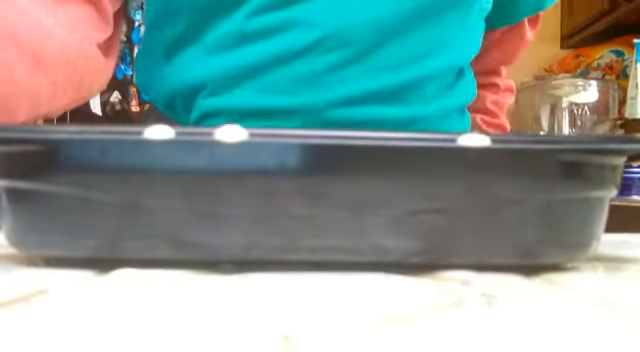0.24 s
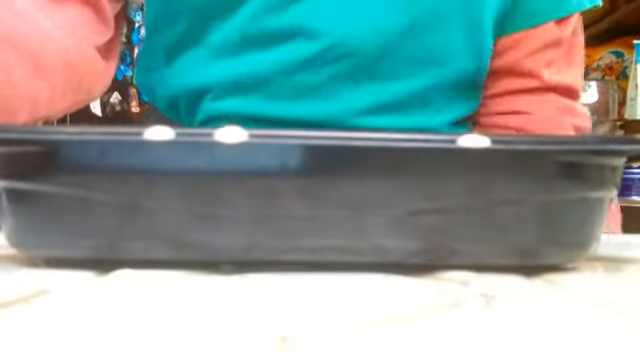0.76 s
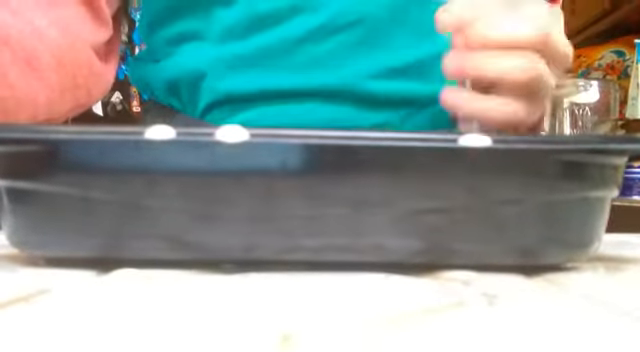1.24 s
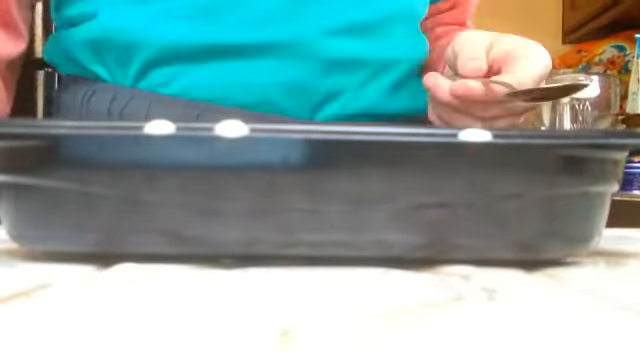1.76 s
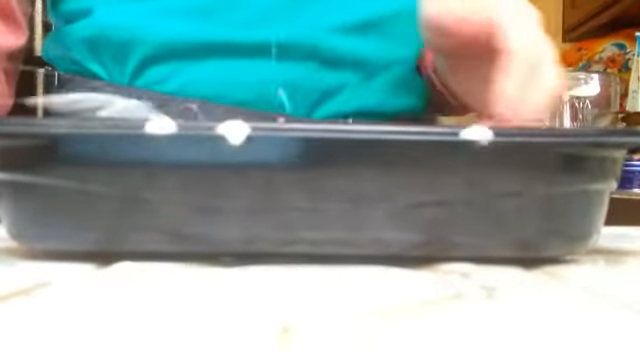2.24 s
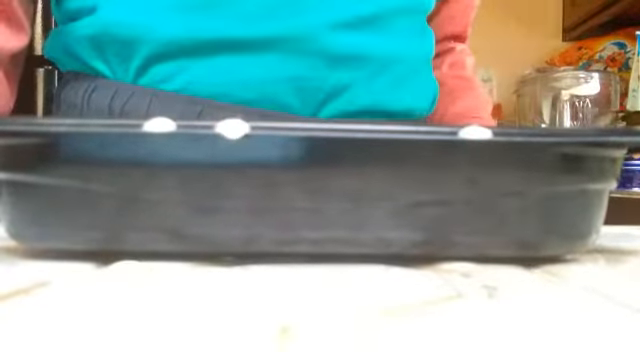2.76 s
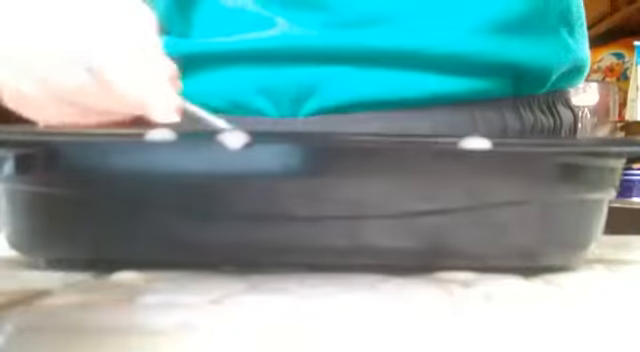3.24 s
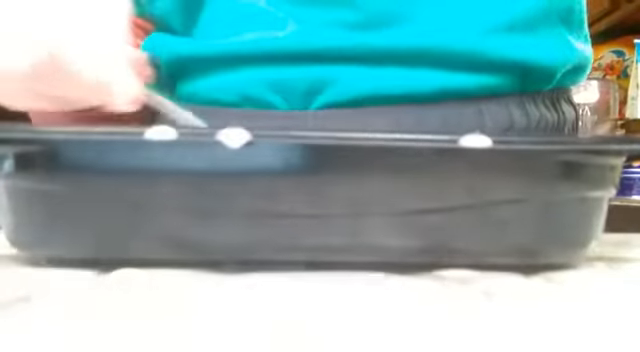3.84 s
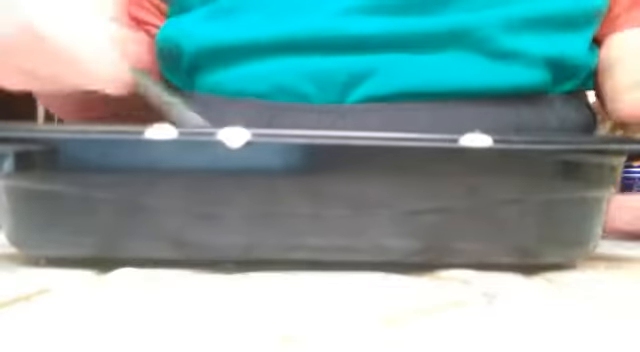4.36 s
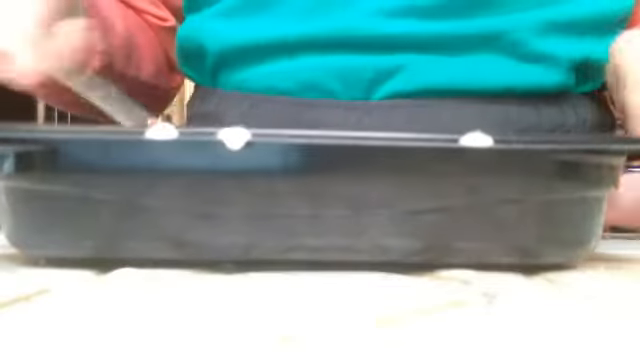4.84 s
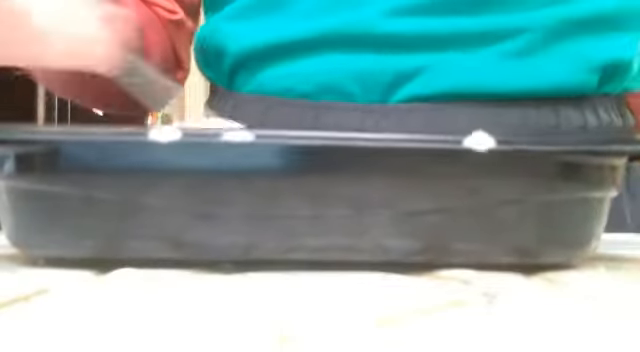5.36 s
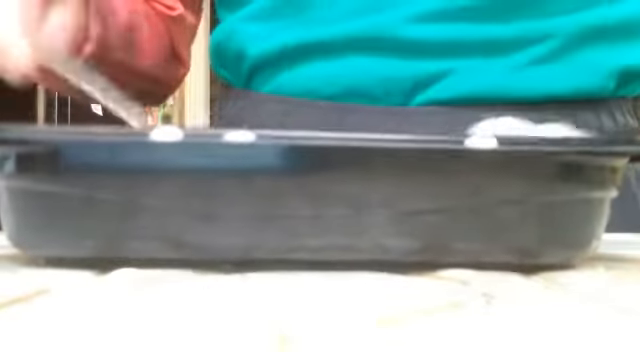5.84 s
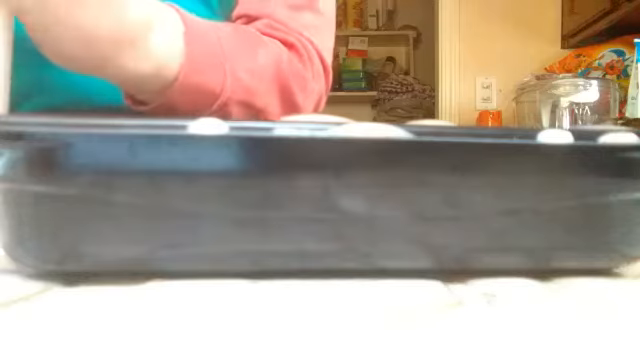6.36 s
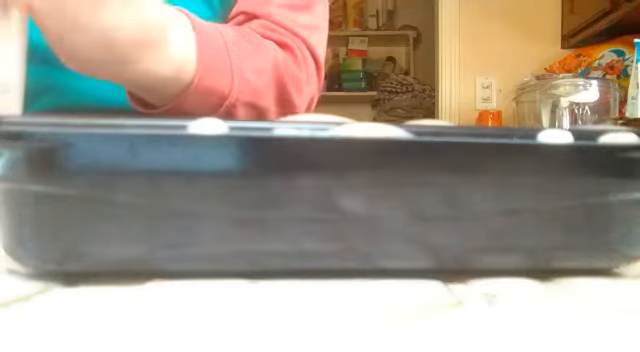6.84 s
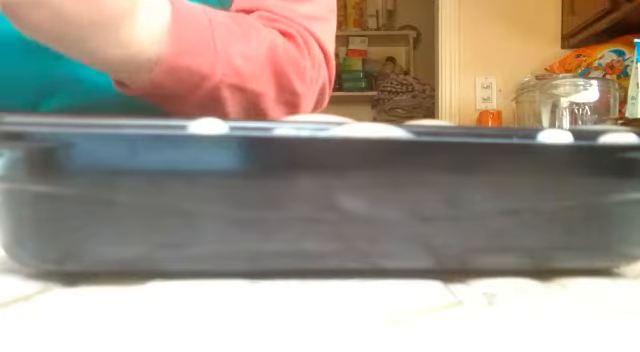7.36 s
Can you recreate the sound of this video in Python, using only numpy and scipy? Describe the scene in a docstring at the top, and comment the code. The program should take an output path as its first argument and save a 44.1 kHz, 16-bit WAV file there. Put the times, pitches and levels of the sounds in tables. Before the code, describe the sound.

A pan is dragged over a counter, a spoon clatters and stirs milk with plops and splashes, then something heavy thuds down.

```python
"""A kitchen counter, heard in stereo from close by. A refrigerator hums throughout.
A bag rustles, then a pan is dragged over the counter, rasping and bumping as it catches.
A sleeve swishes past, and a spoon is dropped and rings briefly. The spoon slides along the pan
and stirs milk: air pockets plop, drops ping and spray hisses.
At last a heavy thing is set down with a thud and shuffled about."""
import sys
import numpy as np
from scipy import signal
from scipy.fft import rfft, irfft, next_fast_len
from scipy.io import wavfile

SR = 44100
rng = np.random.default_rng(int(sys.argv[2]) if len(sys.argv) > 2 else 0)


def wav_out(sig):
    """Save sig, one row per channel (or a flat mono array), as 16-bit PCM at SR to the path in sys.argv[1]."""
    wavfile.write(sys.argv[1], SR, np.round(np.clip(np.atleast_2d(sig).T, -1, 1) * 32767).astype(np.int16))


N = 335601
TIME = np.arange(N) / SR

# Tone colours of noise, all four with columns f/Hz, level/dB
RUMBLE = [(20, -46.5), (60, -13.5), (204, -1), (240, -9.5), (306, 3.5), (407, -13), (900, -8.5),
          (1200, -54.5)]   # the counter shaking
SCRAPE = [(250, -26.5), (450, -2), (750, -6), (1600, -10), (2200, -18.5), (6000, -36.5)]   # rough surfaces catching
HISS = [(880, -6.5), (1500, -3), (5310, -15), (8260, -11.5), (9310, -19.5), (13200, -12), (16800, -21.5)]   # fine rubbing
SPRAY = [(1200, -5.5), (2000, -3.5), (9700, -33), (13900, -38), (16500, -26.5)]   # bright noise of splashing or brushing
# The counter's deep boom: f/Hz, width/Hz, boost/dB
BOOM = [(64, 40, 12)]
# How hard the spoon stirs, given as the loudness of the spray: t/s, level/dB
STIR = [(3.599, -96), (3.72, -52.5), (4.0, -89), (4.6, -60.5), (4.79, -68.5), (4.867, -45.5), (5.12, -58),
        (5.45, -42.5), (5.8, -45), (6.0, -41.5), (6.195, -52.5), (6.211, -109)]


def from_db(db):
    """Turns decibels into a gain to multiply by."""
    return 10 ** (np.asarray(db) / 20)


def rms_one(x):
    """Scales a signal to an average strength (rms) of 1."""
    return x / np.sqrt(np.mean(x ** 2) + 1e-20)


def filtered(x, order, hz, kind):
    """Keeps the "low", "high" or "band" part of a sound."""
    return signal.sosfilt(signal.butter(order, hz, kind, fs=SR, output="sos"), x)


def gains(rows):
    """One gain over time for each dB column, silent outside the table."""
    times, *columns = np.transpose(rows)
    return np.array([from_db(np.interp(TIME, times, db, left=-200, right=-200)) for db in columns])


def strokes(rows):
    """One gain over time for each dB column; each row swells 40 dB up to its time, holds and fades."""
    power = 0
    for s, rise, hold, fall, *levels_db in rows:
        shape_db = -40 * np.maximum(0, np.maximum((s - TIME) / rise, (TIME - s - hold) / fall))
        power = power + from_db(np.maximum(shape_db, -200) + np.array(levels_db)[:, None]) ** 2
    return np.sqrt(power)


def flicker(rate_hz, depth_db):
    """A random gain that wavers about rate_hz times a second."""
    pole = np.exp(-2 * np.pi * rate_hz / SR)
    slow = signal.lfilter([1], [1, -2 * pole, pole * pole], rng.standard_normal(N + SR))[SR:]
    return from_db(depth_db * rms_one(slow))


def diffuse(size, contact=1., mic_spacing_m=.15):
    """Left and right spectra of noise from all around: alike in the bass, different higher up."""
    padded = next_fast_len(size, real=True)
    padded += padded % 2
    hz = np.fft.rfftfreq(padded, 1 / SR)
    alike = .95 * np.sinc(2 * hz * mic_spacing_m / 343)
    mid, side = rfft(contact * rng.standard_normal((2, size)), padded)
    return hz, np.sqrt(1 + alike) * mid + np.sqrt(1 - alike) * side * [[1], [-1]]


def coloured(spectrum, contact=1., peaks=()):
    """Stereo noise with a given tone colour; an uneven contact makes it grainy."""
    hz, pair = diffuse(N, contact)
    table_hz, table_db = np.transpose(spectrum)
    shape_db = np.interp(np.log(hz + 1), np.log(table_hz), table_db, left=-150, right=-150)
    for peak_hz, width_hz, boost_db in peaks:
        shape_db += boost_db / (1 + (2 * (hz - peak_hz) / width_hz) ** 2)
    return rms_one(irfft(pair * from_db(shape_db))[:, :N])


def add(out, s, sound):
    """Lays a short sound into a track at s seconds."""
    at = round(s * SR)
    out[at:at + len(sound)] += sound[:N - at]


def ping(hz, t60, octaves):
    """A short tone whose pitch glides, fast at first; t60 is the time to fade by 60 dB."""
    t = np.arange(round(.12 * SR)) / SR
    pitch = hz * 2 ** (octaves * (1 - np.exp(-t / .035)))
    envelope = (1 - np.exp(-t / .0001)) * from_db(-60 * t / t60)
    return envelope * np.sin(2 * np.pi * np.cumsum(pitch) / SR)


def struck(modes, seconds, spread_db):
    """A struck object rings with all its tones at once, each with a partly random strength."""
    t = np.arange(round(seconds * SR))[:, None] / SR
    hz, level_db, t60 = np.transpose(modes)
    chance_db = spread_db * rng.standard_normal(len(hz))
    sound = (from_db(level_db + chance_db - 60 * t / t60) * np.sin(2 * np.pi * hz * t)).sum(axis=1)
    return sound / np.max(np.abs(sound))


def crack(level_db, t60, band_hz, order=1):
    """A burst of noise that dies quickly."""
    t = np.arange(round(.12 * SR)) / SR
    burst = rng.standard_normal(len(t)) * from_db(level_db - 60 * t / t60)
    return filtered(burst, order, band_hz, "band")


def rubbing(scrape_gain, hiss_gain, rumble_db):
    """Rough surfaces catch unevenly: a lumpy rumble, a grainy scrape and a fine hiss."""
    rumble = from_db(rumble_db) * coloured(RUMBLE, flicker(90, depth_db=2.5))
    scrape = coloured(SCRAPE, flicker(220, depth_db=3))
    hiss = coloured(HISS, flicker(74, depth_db=1.2))
    return scrape_gain * (rumble + scrape) + hiss_gain * hiss


def fridge():
    """The compressor's tones waver slightly over the drone of the fan and case."""
    hum_tones = [(177.6, 1.5), (473.7, -7), (592.2, -13), (705.2, -6.5), (1475, -17), (1771, -23.5)]   # compressor: f/Hz, level/dB
    drone_colour = [(20, -24.5), (179, -3), (230, -14.5), (289, -6), (709, -23), (994, -25), (1510, -24.5),
                    (2010, -44), (14300, -48), (16500, -53)]   # fan and case: f/Hz, level/dB
    drone_peaks = [(716, 290, 9)]   # a strong band in the drone: f/Hz, width/Hz, boost/dB
    loudness = [(0, -54), (6.35, -53), (6.45, -59.5), (7.45, -62), (7.61, -54)]   # dips for about a second near the end: t/s, level/dB
    tones = 0
    for hz, db in hum_tones:
        cycles = hz * TIME + rng.random((2, 1)) * hz / 4000   # left and right a little out of step
        tones += from_db(db) * flicker(3.9, depth_db=1) * np.sin(2 * np.pi * cycles)
    drone = from_db(2.5) * coloured(drone_colour, peaks=drone_peaks)
    return gains(loudness)[0] * (tones + drone)


def bag_rustle():
    """The bag rubs against itself as it is crumpled."""
    crumples = [(.01, 0.028, 0.0056, 0.19, -26, -40), (.045, 0.21, 0.0014, 0.11, -39, -23),
                (.135, 0.23, 0.012, 0.3, -38.5, -33), (.375, 0.096, 0.038, 0.016, -38, -34.5)]   # t/s, rise/s, hold/s, fall/s, scrape/dB, hiss/dB
    return rubbing(*strokes(crumples), rumble_db=-7)


def pan_drag():
    """The bottom of the pan rubs over the counter."""
    pull = [(.46, -47, -91), (.53, -45.5, -58.5), (.6, -24.5, -35.5), (.72, -21.5, -24), (.78, -27, -46.5),
            (.88, -22.5, -35.5), (.97, -21, -34.5), (1.02, -25, -27), (1.148, -38, -37.5), (1.16, -83, -58)]   # loudness of the drag: t/s, scrape/dB, hiss/dB
    return rubbing(*gains(pull), rumble_db=-3)


def pan_rasp():
    """The pan's foot slips unevenly: two narrow bands of noise that climb as the drag tightens."""
    glide = [(.52, 847, -46.5), (.57, 900, -40.5), (.65, 700, -28.5), (.74, 632, -25.5), (.87, 1091, -28),
             (.89, 1110, -54.5)]   # path of the lower band: t/s, f/Hz, level/dB
    times, pitches, _ = np.transpose(glide)
    phase = 2 * np.pi * np.cumsum(np.interp(TIME, times, pitches)) / SR
    slips = filtered(rng.standard_normal((2, N)), order=2, hz=140, kind="low")
    lower = slips[0] * np.sin(phase)
    upper = from_db(-5) * slips[1] * np.sin(1.8 * phase)
    return gains(glide)[1] * rms_one(lower + upper)


def pan_jolt():
    """The pan catches and presses hard on the counter, which booms and grinds."""
    catch = [(.887, .003, 0.083, 0.22, -18, -24)]   # t/s, rise/s, hold/s, fall/s, boom/dB, grind/dB
    boom, grind = strokes(catch)
    return boom * coloured(RUMBLE, flicker(90, depth_db=2.5), BOOM) + grind * coloured(SPRAY)


def knocks(thud_cycles=9, thud_attack_s=.00025):
    """Each blow makes a tick at first contact, a thud, a crack and a ring in the counter."""
    # Blows on counter and pan: t/s, thud/dB, thud f/Hz, crack/dB, ring compared with thud/dB
    blows = [(.887, -9, 220.6, -26, -7.5), (0.962, -17, 302, -17.5, -13), (2.3478, -3, 660, -17, -20),
             (2.353, -16.5, 191, -37, 2.5), (2.4415, -15, 600, -23, -14.5), (2.4425, -14, 2500, -30, -30),
             (2.465, -21, 634, -56, -3), (3.663, -36.5, 198, -39.5, 5), (3.843, -39.5, 292, -32.5, 14.5),
             (6.358, -13.5, 285, -56, 9.5), (6.385, -15, 321, -46, 1), (6.436, -13.5, 477, -36, -20),
             (6.847, -34.5, 610, -41, 4.5), (6.889, -23.5, 730, -37.5, -11),
             (7.028, -40.5, 308, -46.5, 2.5), (7.101, -36.5, 270, -37.5, 10.5), (7.221, -43, 605, -52, 4),
             (7.335, -33.5, 293, -61, -2)]
    counter_tones = [(81, -6, 0.13), (181.9, -9, 0.18), (260.3, -1.5, 0.11), (312, -8.5, 0.19),
                     (517, 8.5, 0.011)]   # the counter's ring: f/Hz, level/dB, t60/s
    out = np.zeros(N)
    for s, thud_db, hz, crack_db, ring_db in blows:
        thud = from_db(thud_db) * ping(hz, thud_cycles / hz, octaves=0)
        thud *= 1 - np.exp(-TIME[:len(thud)] / thud_attack_s)
        tick = crack(crack_db, t60=.015, band_hz=(1800, 4500))
        add(out, s, thud + tick + crack(crack_db, t60=.16, band_hz=(1220, 2530)))
        add(out, s, from_db(thud_db + ring_db) * struck(counter_tones, seconds=.3, spread_db=3))
    return filtered(out, order=4, hz=60, kind="high")   # deep bass below 60 Hz is taken out


def sleeve_swish():
    """A sleeve brushes past with a soft swell of noise."""
    brush = [(1.27, 0.13, 0.056, 0.14, -56.5)]   # t/s, rise/s, hold/s, fall/s, level/dB
    return strokes(brush) * coloured(SPRAY)


def spoon_ring(struck_s=2.354, lands_s=2.437):
    """The dropped spoon sings slightly sagging notes until it lands again."""
    notes = [(1736, -47, 0.9), (4100, -34, 0.31)]   # f/Hz, level/dB, t60/s
    out = np.zeros(N)
    for hz, level_db, t60 in notes:
        note = from_db(level_db) * ping(hz, t60, octaves=-.015)
        add(out, struck_s, note[:round((lands_s - struck_s) * SR)])
    return out


def spoon_slide():
    """The spoon scrapes along the bottom of the pan."""
    loudness = [(3.16, -69.5), (3.66, -60)]   # t/s, level/dB
    ringing_bands = [(1140, 380, 28.5), (3110, 110, 10)]   # f/Hz, width/Hz, boost/dB
    colour = [(600, -17), (1500, 9), (9000, -0.5)]   # f/Hz, level/dB
    return gains(loudness)[0] * coloured(colour, peaks=ringing_bands)


def milk_slosh(vigour):
    """Stirring rocks the pan with a low rumble and throws up bursts of spray."""
    rocking = from_db(-47) * vigour ** .95 * coloured(RUMBLE, flicker(25, depth_db=3), BOOM)
    spray = gains(STIR)[0] * coloured(SPRAY, flicker(30, depth_db=5.5))
    return rocking + spray


def milk_gurgle(vigour):
    """Many small air pockets ring at random moments, louder when the stirring is harder."""
    start_s, end_s = STIR[0][0], STIR[-1][0]
    out = np.zeros(N)
    for when, pitch, softness, rise in rng.random((200, 4)):
        hz = 1500 * 2 ** (1.7 * pitch)
        pocket = from_db(-20 * softness) * ping(hz, t60=30 / hz, octaves=.6 * rise)
        add(out, start_s + when * (end_s - start_s), pocket)
    return from_db(-54) * vigour * out / np.std(out[out != 0])


def milk_plops(ping_cycles=26):
    """Air pockets ring, most rising in pitch as they near the surface; drops ping and milk slaps."""
    pockets = [(3.674, -38, 1158, 0.077, -0.17), (4.109, -39.5, 734, 0.073, 2.1),
               (4.3, -30, 966, 0.058, 0.34), (4.42, -19.5, 1575, 0.05, 0.16),
               (4.468, -35, 666, 0.043, -0.72), (4.529, -38.5, 1030, 0.084, 1.3),
               (4.814, -32, 1435, 0.06, 0.59), (5.011, -18, 884, 0.013, -1.7),
               (5.162, -36.5, 1500, 0.08, 0.56), (5.206, -18, 672, 0.047, 3.2),
               (5.251, -20.5, 1300, 0.096, 0.75), (5.333, -20, 950, 0.042, -1.8),
               (5.365, -23.5, 710, 0.08, 1.96), (5.387, -37, 1940, 0.069, -1.1),
               (5.476, -31.5, 1452, 0.065, -0.45), (5.675, -17, 560, 0.026, 0.85),
               (5.686, -34, 1430, 0.065, .4), (5.704, -26, 633, 0.045, 2.1), (5.748, -32.5, 830, 0.07, 0.7),
               (5.768, -39, 1210, 0.087, 1.3), (5.79, -37.5, 964, 0.074, 0.97),
               (5.847, -29, 547, 0.073, 0.9), (6.009, -22.5, 598, 0.066, 0.31),
               (6.021, -23.5, 907, 0.037, 1.3)]   # air closed in by milk: t/s, level/dB, f/Hz, t60/s, glide/octaves
    pings = [(4.063, -32.5, 1460), (4.3, -21, 2390), (4.461, -38, 1170), (4.702, -26.5, 1910),
             (4.842, -35, 4100), (4.876, -40, 3900), (4.9177, -34, 895), (5.0123, -23.5, 2750),
             (5.047, -29, 1720), (5.162, -31.5, 590), (5.193, -33, 2460), (5.301, -39, 3140),
             (5.334, -37, 2800), (5.355, -26, 2100), (5.409, -34, 1050), (5.423, -30.5, 950),
             (5.491, -20.5, 2010), (5.491, -24, 3020), (5.502, -28, 710), (5.539, -32, 1530),
             (5.587, -29, 1270), (5.6126, -27, 1360), (5.698, -29, 2510), (5.736, -29, 1940),
             (5.848, -14.5, 1870), (5.88, -25.5, 1210), (5.918, -29, 1074), (5.946, -20.5, 1820),
             (5.947, -26, 4520), (5.953, -21, 2320), (5.979, -32, 1837), (6.041, -23.5, 875),
             (6.061, -29.5, 1870), (6.0934, -19.5, 4300)]   # short pings from drops and small air pockets: t/s, level/dB, f/Hz
    slaps = [(4.301, -32.5), (5.0126, -43), (5.164, -49), (5.423, -43), (5.44, -41), (5.6134, -40.5),
             (5.698, -49), (5.848, -32.5), (5.952, -50), (6.0918, -29.5)]   # broad splashes: t/s, level/dB
    out = np.zeros(N)
    for s, db, hz, t60, octaves in pockets:
        add(out, s, from_db(db) * ping(hz, t60, octaves))
    for s, db, hz in pings:
        tick = crack(db - 5, t60=.012, band_hz=(hz / 2, hz * 2), order=2)
        add(out, s, tick + from_db(db) * ping(hz, ping_cycles / hz, octaves=.3))
    for s, db in slaps:
        add(out, s, crack(db, t60=.032, band_hz=(2000, 13000)))
    return filtered(out, order=2, hz=300, kind="high")   # pockets give off no bass


def heavy_shuffle():
    """The heavy thing settles and slides, juddering and hissing against the counter."""
    shoves = [(6.36, 0.0036, 0.061, 0.12, -13.5, -48.5), (6.86, 0.05, 0.0052, 0.14, -30, -41.5),
              (7.305, 0.09, 0.004, 0.12, -39.5, -56)]   # t/s, rise/s, hold/s, fall/s, body/dB, hiss/dB
    body_colour = [(50, -68), (200, -3), (375, -5), (500, 0), (900, -12.5), (5000, -40), (9000, -52.5)]   # its dull scrape: f/Hz, level/dB
    body_gain, hiss_gain = strokes(shoves)
    body = body_gain * coloured(body_colour, flicker(90, depth_db=2.5))
    return body + hiss_gain * coloured(HISS, flicker(74, depth_db=1.2))


def placed(x, left_lag_s, left_db, room_db):
    """Sound reaches one microphone first; pan and counter echo briefly, the walls for longer."""
    near_t60, walls_t60, walls_db, dull_hz = .029, .38, -20.5, 3000
    size = SR // 2
    hz, pair = diffuse(size)
    t = TIME[:size]
    fade = from_db(-60 * t / near_t60) + from_db(walls_db - 60 * t / walls_t60)
    dull_noise = irfft(pair / (1 + 1j * hz / dull_hz))[:, :size]
    echo = dull_noise * fade * (1 - np.exp(-t / .00031))
    echo *= from_db(room_db) / np.sqrt(np.sum(echo ** 2) / 2)
    direct = np.array([np.roll(x, round(max(lag, 0) * SR)) for lag in (left_lag_s, -left_lag_s)])
    direct *= from_db([[left_db / 2], [-left_db / 2]])
    return direct + signal.fftconvolve(x[None], echo, axes=1)[:, :N]


def scene():
    """Mixes it all: the milk and early knocks sit to the left, the heavy thing's knocks to the right."""
    heavy_from_s, full_stir_db = 6.3, -45
    blows = knocks()
    early = blows * (TIME < heavy_from_s) + pan_rasp()
    left = placed(early, left_lag_s=-.00018, left_db=1.5, room_db=-7)
    vigour = gains(STIR)[0] / from_db(full_stir_db)
    milk = placed(milk_gurgle(vigour) + milk_plops(), left_lag_s=-.00016, left_db=3, room_db=-8)
    # the later knocks, with their deep bass filtered out
    bass_cut = filtered(blows, order=2, hz=135, kind="high") * (TIME >= heavy_from_s)
    right = placed(bass_cut, left_lag_s=.00025, left_db=-4.5, room_db=.5)
    return (fridge() + bag_rustle() + pan_drag() + pan_jolt() + left + sleeve_swish() + spoon_ring()
            + spoon_slide() + milk_slosh(vigour) + milk + right + heavy_shuffle())


def record(dry):
    """Rounds off loud peaks and cuts the highest treble."""
    cutoff_hz = 16450
    return signal.sosfilt(signal.cheby2(14, 70, cutoff_hz, fs=SR, output="sos"), np.tanh(dry))


dry = scene()
out = record(dry)
wav_out(out)
```